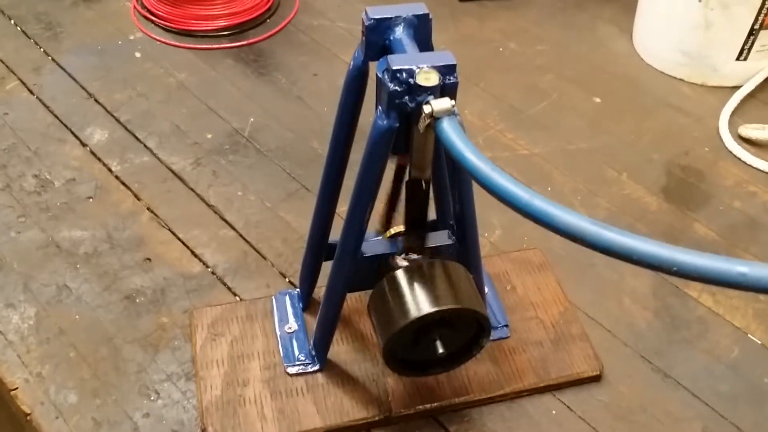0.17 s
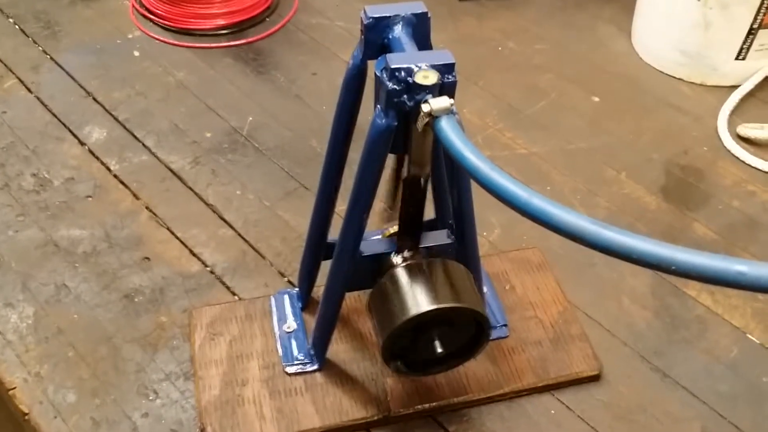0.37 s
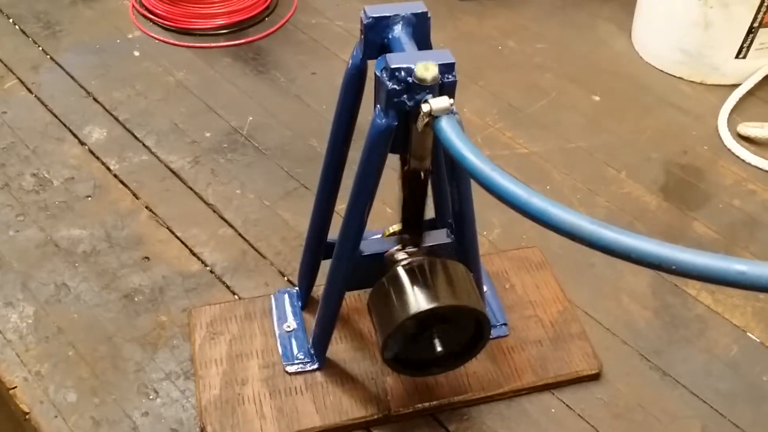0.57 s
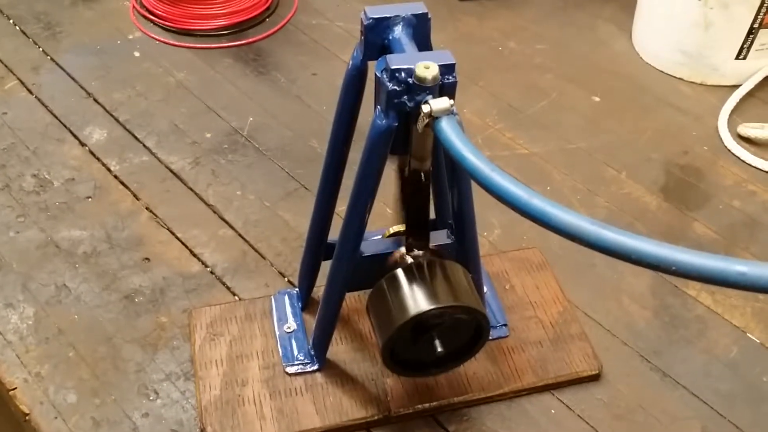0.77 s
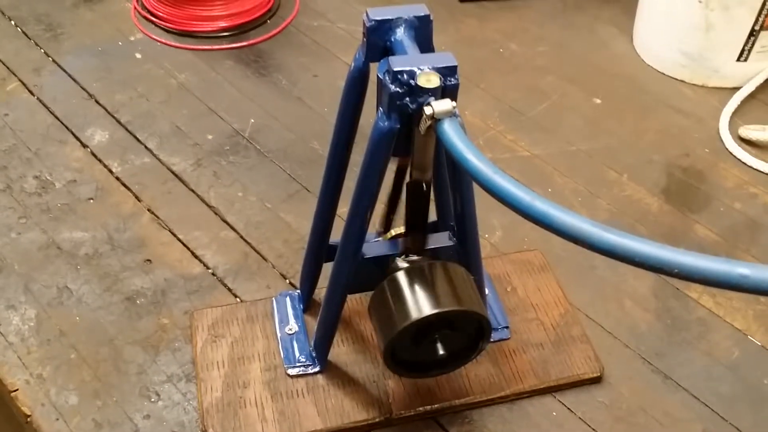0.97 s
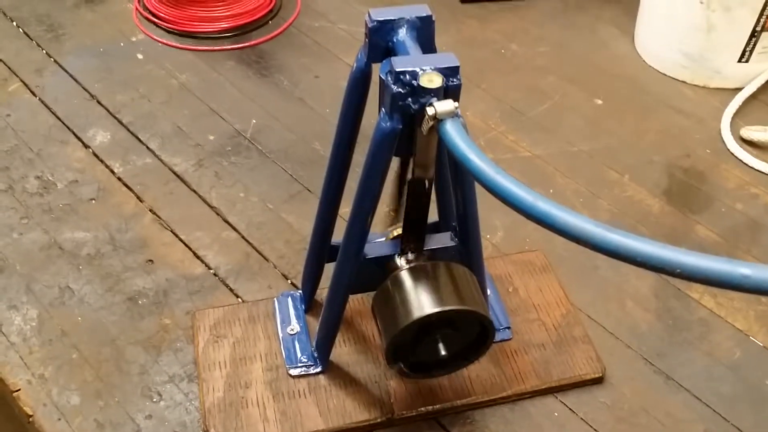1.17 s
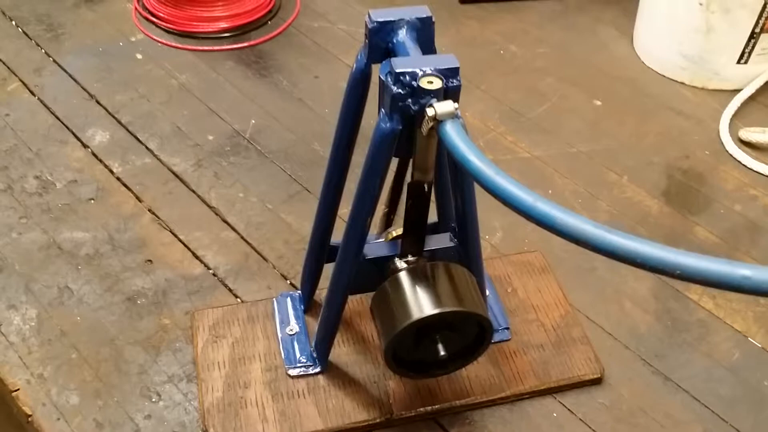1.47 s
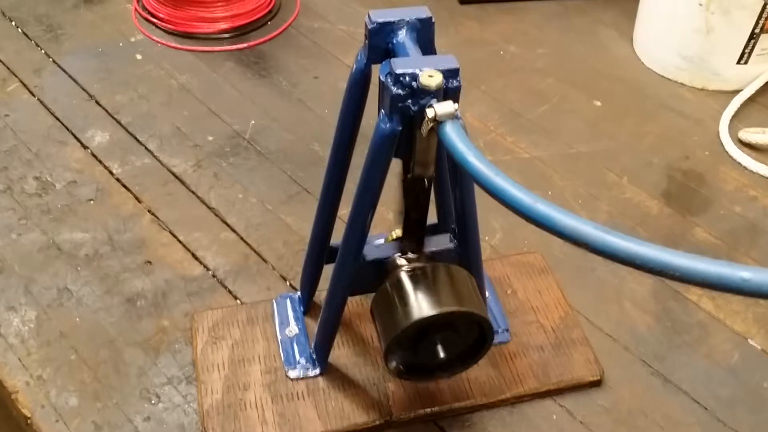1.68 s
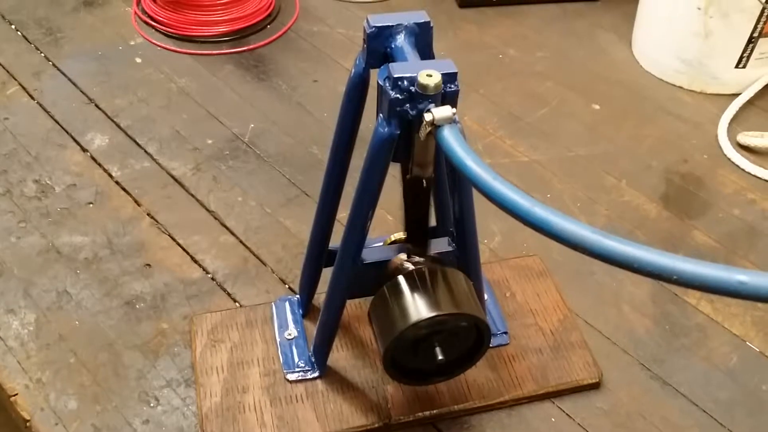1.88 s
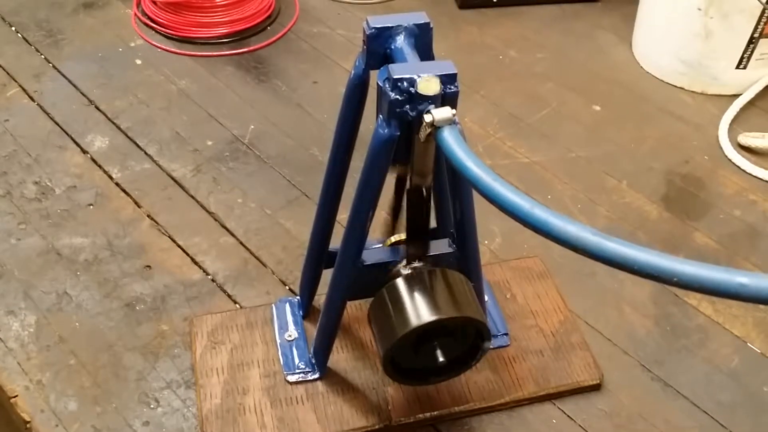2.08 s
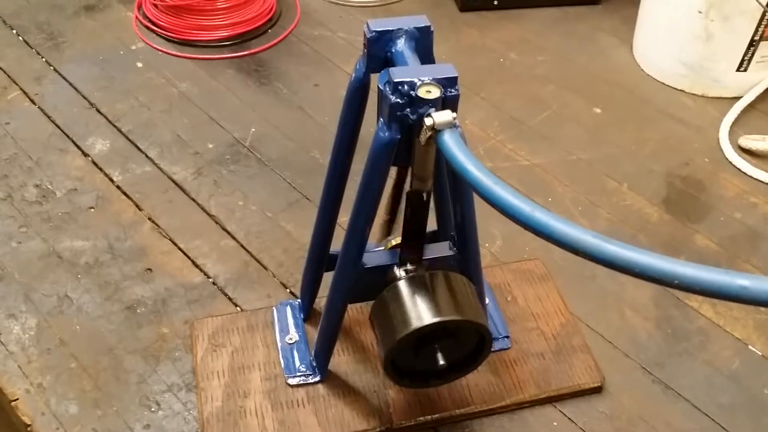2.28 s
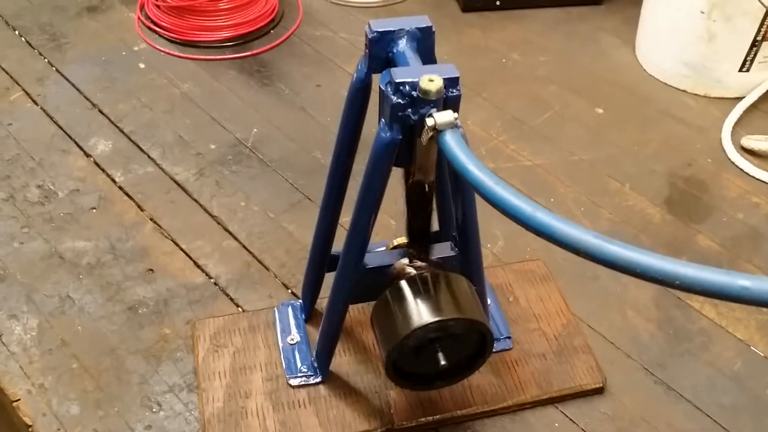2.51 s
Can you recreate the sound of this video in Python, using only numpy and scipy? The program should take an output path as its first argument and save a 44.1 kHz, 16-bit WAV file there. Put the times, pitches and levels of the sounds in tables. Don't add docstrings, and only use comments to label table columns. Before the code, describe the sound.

Small hose-fed engine running steadily: rapid squeaky air puffs and rattly clicks over a low workshop rumble.

```python
import sys
import numpy as np
from scipy import signal
from scipy.fft import rfft, irfft, next_fast_len
from scipy.io import wavfile
from scipy.ndimage import uniform_filter1d

SR = 44100
rng = np.random.default_rng(int(sys.argv[2]) if len(sys.argv) > 2 else 0)


def transcribe(u):
    v = np.clip(np.atleast_2d(u).T, -1, 1)
    q = np.round(v * 32767).astype(np.int16)
    wavfile.write(sys.argv[1], SR, q)


def undo_db(level):
    steps = np.asarray(level, float) / 20
    return 10 ** steps


N = 116865


def rms_one(x):
    return x / np.sqrt(np.mean(np.abs(x) ** 2) + 1e-20)


def at_hz(points, hz):
    point_hz, db = np.array(points).T[:2]
    return np.interp(np.log(np.maximum(hz, 1)), np.log(point_hz), db)


def colour(x, points):
    size = next_fast_len(N + 4096)
    log_gain = at_hz(points, np.fft.rfftfreq(2048, 1 / SR)) * np.log(10) / 20
    cepstrum = irfft(log_gain)
    cepstrum[1:1024] *= 2
    cepstrum[1025:] = 0
    impulse = irfft(np.exp(rfft(cepstrum)))
    return irfft(rfft(x, size) * rfft(impulse, size), size)[..., :N]


def drift(hz):
    r = np.exp(-2 * np.pi * hz / SR)
    settle = 20000
    noise = rng.standard_normal(N + settle)
    return rms_one(signal.lfilter([1], [1, -2 * r, r * r], noise)[settle:])


def ring(clicks, hz, t60):
    r = undo_db(-60 / (t60 * SR))
    w = 2 * np.pi * hz / SR
    return signal.lfilter([0, np.sin(w)], [1, -2 * r * np.cos(w), r * r], clicks + 1e-18)


def dying(clicks, t60):
    return signal.lfilter([1], [1, -undo_db(-60 / (t60 * SR))], clicks + 1e-18)


def blows(rows, count=1):
    rows = np.array(rows)
    clicks = np.zeros(N)
    clicks[(rows[:, 0] * SR).astype(int)] = undo_db(rows[:, 1:1 + count].sum(axis=1))
    return clicks


def hiss(points, alike):
    left_leads_s = 0.000036
    shared, *own = colour(rng.standard_normal((3, N)), points)
    delay = np.exp(-2j * np.pi * np.fft.rfftfreq(N, 1 / SR) * left_leads_s)
    late = irfft(rfft(shared) * delay, N)
    return rms_one(np.sqrt(alike) * np.array([shared, late]) + np.sqrt(1 - alike) * np.array(own))


# (frequency [Hz], level [dB per Hz])
RUMBLE = [(35, -43), (58, -42), (80, -16), (300, -9.5), (500, -15), (1200, -21.5), (2200, -26.5),
          (5000, -36)]
# (frequency [Hz], width [Hz], level [dB])
BOOMS = [(76.4, 5.6, -33.5), (111, 31, -36.5), (133.4, 11.6, -35), (196, 29, -33.5), (206.95, 5.7, -33.5),
         (231.3, 29.6, -32), (265.7, 24, -37.5), (369.7, 5.5, -44.5)]
# (frequency [Hz], level [dB])
MOTOR = [(708, -50), (938, -49), (969, -50), (1293, -52)]
# (frequency [Hz], likeness [-1 to 1])
LIKENESS = [(60, 1), (200, 0.95), (400, 0.79), (700, 0.29), (1300, 0.0093), (5000, 0.058)]
# (time [s], level [dB])
SWELL = [(0, -0.5), (.15, 1), (.35, -0.5), (.55, 0), (.75, 0.5), (.95, 0), (1.15, 0.5), (1.35, 1), (1.55, 0),
         (1.7, 0), (1.9, 1), (2.05, -1.5), (2.25, 0.5), (2.45, 1), (2.65, -1)]


def shop():
    rumble_db, patchy_db = -30.5, 1
    hz = np.fft.rfftfreq(N, 1 / SR)
    white = rfft(rng.standard_normal((2, N)))
    air_loss_db = 2.1 * np.maximum(np.log2(np.maximum(hz, 1) / 6000), 0)
    power = undo_db(at_hz(RUMBLE, hz) - air_loss_db) ** 2
    power *= undo_db(rumble_db) ** 2 / power.mean()
    for centre_hz, width_hz, db in BOOMS:
        peak = 1 / (1 + (2 * (hz - centre_hz) / width_hz) ** 2) ** 2
        power = power + undo_db(db) ** 2 * peak / peak.mean()

    alike = np.clip(at_hz(LIKENESS, hz), -1, 1)
    common = np.sqrt(1 + alike) * white[0]
    opposed = np.sqrt(1 - alike) * white[1] * [[1], [-1]]
    rumble = irfft(np.sqrt(power / 2) * (common + opposed), N)

    t = np.arange(N) / SR
    lines = 0
    for line_hz, db in MOTOR:
        level = undo_db(db + 0.5 * drift(1.0))
        phase = 2 * np.pi * line_hz * t + 0.09 * drift(18.0) + rng.uniform(0, 1, (2, 1))
        lines = lines + level * np.sqrt(2) * np.sin(phase)
    swell_db = np.interp(t, *np.transpose(SWELL)) + patchy_db * drift(11.3)
    return rumble * undo_db(swell_db) + lines


# (frequency [Hz], level [dB per Hz])
LEAK = [(3000, -27), (6000, -8), (9000, -8), (13000, 1), (16000, -6.5)]


def leak():
    return undo_db(-37 + 0.77 * drift(10.0)) * hiss(LEAK, alike=0.54)


def crank():
    turn_begins_s = -0.06
    marks = np.array(TURNS)[:, 0]
    t = np.arange(N) / SR
    turn = np.clip(np.searchsorted(marks + turn_begins_s, t) - 1, 0, len(marks) - 1)
    return turn, t - marks[turn]


# (time after mark [s], level [dB])
FLOW = [
    (-.06, -59),
    (-.03, -34.5),
    (-.023, -32),
    (-.004, -26),
    (.008, -17),
    (.024, -24.5),
    (.05, -29.5),
    (.088, -31.5),
    (.101, -31),
]
# (frequency [Hz], level [dB per Hz])
JET = [(1500, -31), (3000, -10), (4800, -7.5), (6500, -5.5), (8500, 3), (11000, 5), (13500, -2),
       (16000, -20.5)]


def jet(since):
    puff = undo_db(-7.5) * dying(blows(KNOCKS, count=2), t60=0.11)
    flow = undo_db(np.interp(since, *np.transpose(FLOW)))
    flutter = undo_db(-0.5 * drift(76.0))
    return np.hypot(flow, puff) * flutter * hiss(JET, alike=0.15)


# (time after mark [s], level [dB])
EXHAUST = [
    (-.02, -60),
    (.01, -18),
    (.03, -68),
    (.085, -31),
    (.1, -42),
]
# (frequency [Hz], level [dB per Hz])
EXHAUST_TONE = [(5000, -27), (6800, 0), (9000, -22), (12000, -9), (14000, -3), (16000, -5)]


def exhaust(since):
    sputter_db, sputter_hz = 2.0, 150
    level_db = np.interp(since, *np.transpose(EXHAUST)) + sputter_db * drift(sputter_hz)
    return undo_db(level_db) * hiss(EXHAUST_TONE, alike=1)


# (time [s], peak level [dB])
RETURNS = [(0.0144, -29), (0.1712, -27), (0.3297, -29.5), (0.4898, -26), (0.6503, -28), (0.8109, -29),
           (0.9709, -27), (1.1293, -28.5), (1.289, -29), (1.4474, -28), (1.6055, -27.5), (1.7662, -28),
           (1.9251, -27.5), (2.0839, -28.5), (2.244, -30), (2.405, -26.5), (2.5619, -31)]
# (time [s], peak level [dB], treble gain [dB])
KNOCKS = [(0.0914, -21.5, 2.5), (0.251, -22, 3.5), (0.4102, -21.5, 3.5), (0.5705, -23.5, 4),
          (0.7294, -21, 0.5), (0.8897, -23, 3), (1.05, -23, 3.5), (1.2087, -19, 2), (1.3674, -21.5, 3),
          (1.5262, -19.5, 1.5), (1.6844, -20, -0.5), (1.8447, -20, 1.5), (2.0039, -21, 1.5),
          (2.1626, -21.5, 2), (2.3228, -23.5, 3), (2.4827, -21, 2.5), (2.6414, -22.5, 4.5)]
# (frequency [Hz], left level [dB], right level [dB], t60 [s])
FRAME = [(550, -19, -15, 0.044), (719, -16.5, -16, 0.07), (929, -21, -16, 0.087), (1150, -18, -21, 0.083),
         (1227, -11, -32, 0.03), (1456, -21.5, -15.5, 0.054), (1745, -13, -15, 0.089),
         (2594, -16.5, -10.5, 0.037), (3536, -17.5, -17, 0.033), (3890, -31, -12.5, 0.034),
         (5570, -17, -15, 0.011), (6790, -12.5, -13.5, 0.013), (7590, -22, -7.5, 0.021),
         (8480, -17, -8, 0.011)]


def knocks():
    strike_db, rattle_t60_s, touches_per_s, knock_db = 7.5, 0.078, 2200, -10.5
    mode_spread = 0.0358
    return_dull_hz = 5000
    touching = rng.random(N) < touches_per_s / SR

    def contact(clicks):
        return dying(clicks, rattle_t60_s) * touching + undo_db(strike_db) * clicks

    dull = contact(blows(KNOCKS) + blows(RETURNS))
    bright = contact(blows(KNOCKS, count=2))
    out = np.zeros((2, N))
    for hz, left_db, right_db, t60 in FRAME:
        blow = dull if hz < return_dull_hz else bright
        for step in (-2, -1, 0, 1, 2):
            force = blow * rng.standard_normal(N)
            tone = ring(force, hz * (1 + mode_spread * step * rng.uniform(0.41, 1)), t60)
            lean_db = rng.normal(0, 1.5) * np.array([[1], [-1]])
            level = undo_db(np.array([[left_db], [right_db]]) + lean_db + knock_db)
            facing = 1 if hz < 900 or step else -1
            out += tone * level * [[facing], [1]]
    return out


# (time [s], peak level [dB], gain toward the top of the climb [dB])
TURNS = [(0.0343, -13.5, 3), (0.1966, -11, 0.5), (0.3555, -11, -1), (0.514, -13.5, 6.5), (0.6747, -11, 1),
         (0.835, -10, -3.5), (0.9946, -11, 1), (1.1539, -9.5, 0), (1.3128, -9, -1), (1.4717, -9.5, -4.5),
         (1.6291, -12, 3), (1.7881, -10, -3), (1.9489, -10, -3.5), (2.1083, -11.5, -1), (2.2676, -13, 1.5),
         (2.4277, -11.5, 0), (2.589, -12, -2)]
# (time after mark [s], frequency [Hz], level [dB], left port level [dB])
WHISTLE = [
    (-.018, 5270, -31, -16),
    (-.010, 5890, -26, 1.5),
    (-.003, 6750, -21.5, 0),
    (.0005, 7160, -1, -9),
    (.008, 8700, 6, -20),
    (0.019, 11260, 3, -0.5),
    (0.024, 13030, -9.5, -24),
    (.029, 14300, -40, -7),
]
PACE = [1.01, 0.992, 0.78, 0.981, 1.01, 1.012, 1.3, 1.1, 1.2, 0.9, 0.91, .99, .99, .96, 1.1, .97, 0.9]


def whistle(turn, since):
    width_hz, skirt_hz, steady, whistle_db, undertone_db = 560, 850, 0.55, -2.5, -27
    since = since * np.array(PACE)[turn]
    s, hz, db, left_db = np.transpose(WHISTLE)
    phase = 2 * np.pi * np.cumsum(np.interp(since, s, hz)) / SR

    waver = steady + drift(width_hz) + 1j * drift(width_hz)
    waver = rms_one(signal.sosfilt(signal.butter(2, skirt_hz, fs=SR, output="sos"), waver))

    _, peak_db, late_db = np.array(TURNS)[turn].T
    level_db = np.interp(since, s, db, -90, -90) + peak_db + late_db * since / s[-2] + whistle_db
    port_gain = undo_db([[1], [0]] * np.interp(since, s, left_db))
    tone = port_gain * np.real(waver * np.exp(1j * phase))
    undertone = undo_db(undertone_db) * np.real(waver * np.exp(0.5j * phase))
    return undo_db(level_db) * (tone + undertone)


# (time [s], left level [dB], right level [dB])
ECHOES = [
    (.0011, 0.5, -23),
    (.0031, -9, -23),
    (.0058, -5.5, -12),
]


def space(x):
    room_db, room_t60_s = -19, 0.83
    t = np.arange(SR // 2) / SR
    tail = rng.standard_normal((2, len(t))) * undo_db(-60 * t / room_t60_s) * (t > 0.006)
    response = undo_db(room_db) * tail / np.sqrt(np.sum(tail ** 2, axis=1, keepdims=True))
    response[:, 0] += 1
    for s, left_db, right_db in ECHOES:
        response[:, int(s * SR)] += undo_db(np.array([left_db, right_db])) * [-1, 1]
    return signal.fftconvolve(x * np.ones((2, 1)), response, axes=1)[:, :N]


def scene():
    turn, since = crank()
    background = shop() + leak()
    air = jet(since) + exhaust(since)
    engine = space(knocks() + whistle(turn, since))
    return background + air + engine


def band_limit(x):
    return signal.sosfilt(signal.butter(12, 15690, fs=SR, output="sos"), x)


# (frequency [Hz], gain [dB])
LEFT_PORT = [(50, -8), (1300, -4), (5500, -1), (6750, 7), (7600, -1.5), (9300, -16.5), (11000, -12.5),
             (13500, -5)]
# (frequency [Hz], gain [dB])
RIGHT_PORT = [(50, -3.5), (2100, -2), (5000, 2.5), (6850, 3), (7200, 7), (8600, 5.5), (10000, 0.04),
              (14300, 5.5)]


def record(dry):
    squeeze_from_db, squeeze_share, squeeze_s = -21, 0.3, 0.0089
    cutoff_hz, top = 14450, 1.3
    ports = np.array([colour(dry[0], LEFT_PORT), colour(dry[1], RIGHT_PORT)])
    power = uniform_filter1d(np.mean(ports ** 2, axis=0), int(squeeze_s * SR))
    level_db = 10 * np.log10(power + 1e-12)
    ports = ports * undo_db(-squeeze_share * np.maximum(level_db - squeeze_from_db, 0))
    rounded = top * np.tanh(ports / top)
    mix = signal.sosfilt(signal.ellip(8, 0.5, 60, cutoff_hz, fs=SR, output="sos"), rounded)
    return band_limit(mix)


dry = scene()
out = record(dry)
transcribe(out)
```